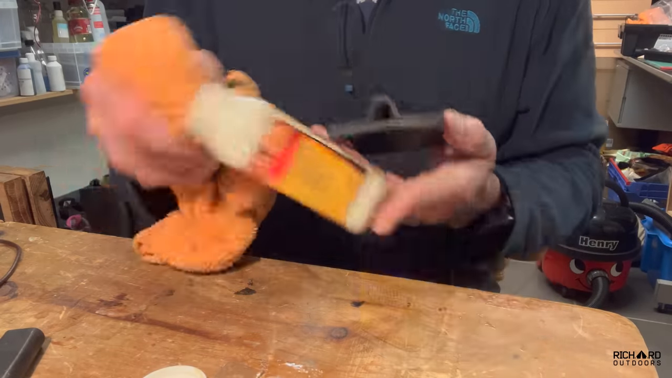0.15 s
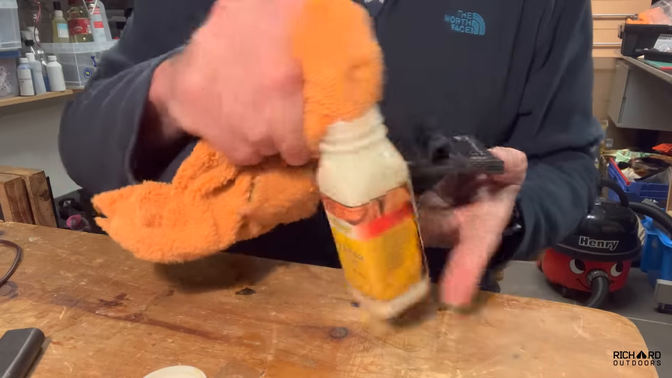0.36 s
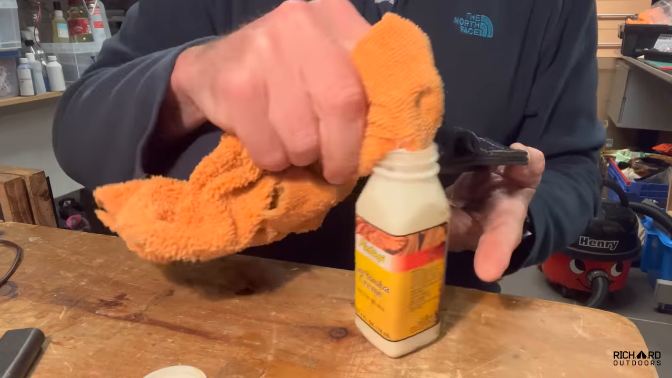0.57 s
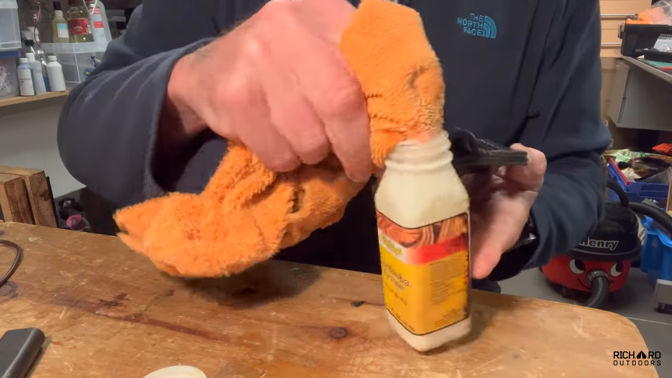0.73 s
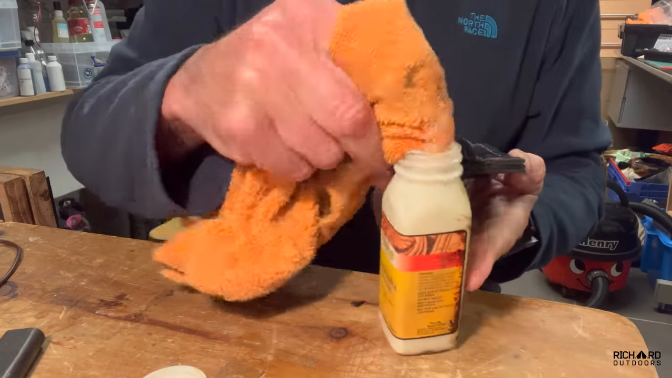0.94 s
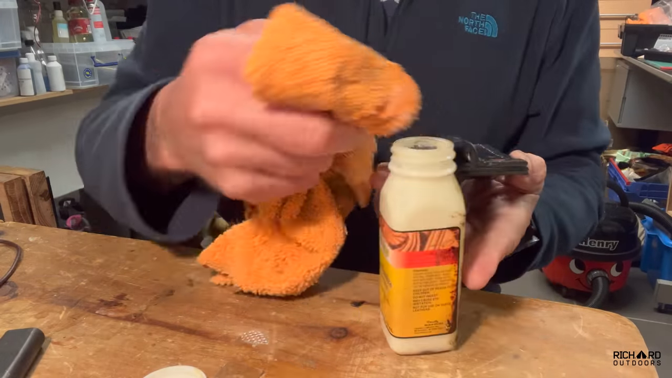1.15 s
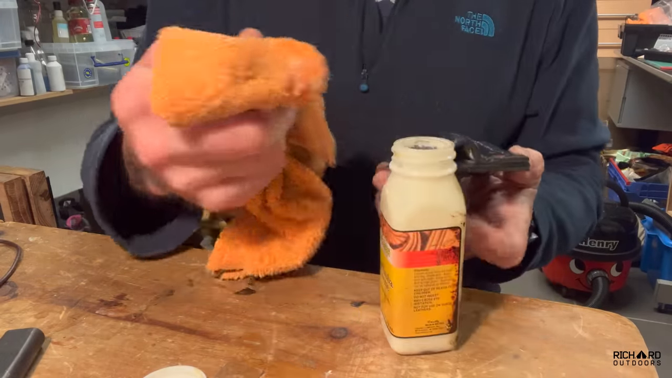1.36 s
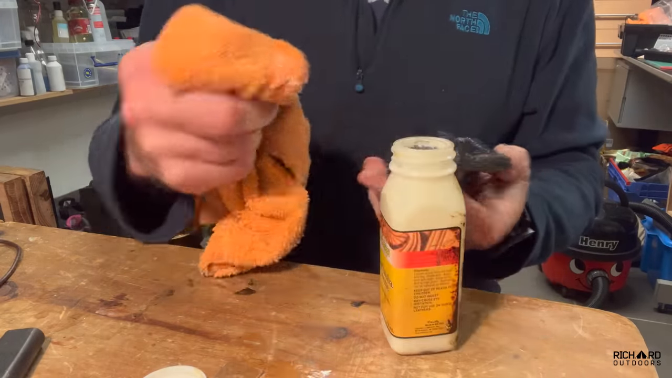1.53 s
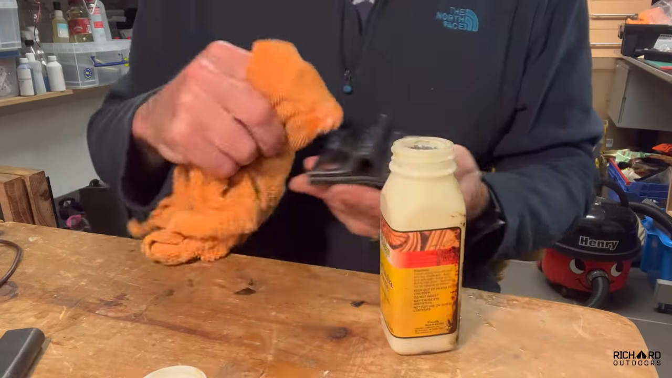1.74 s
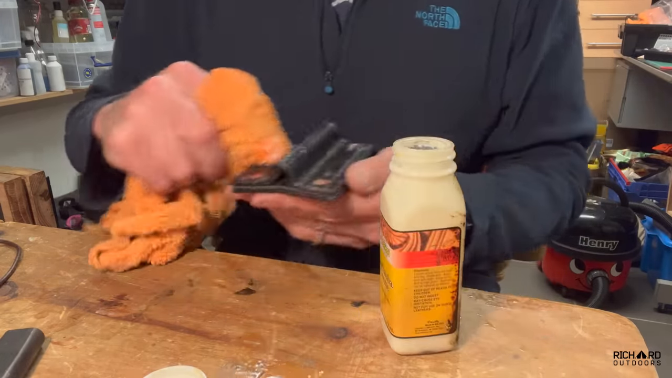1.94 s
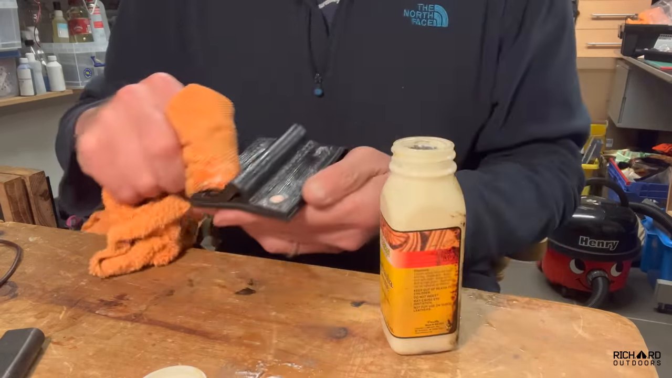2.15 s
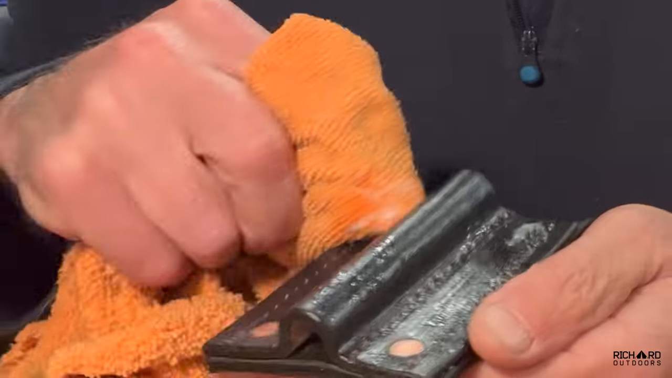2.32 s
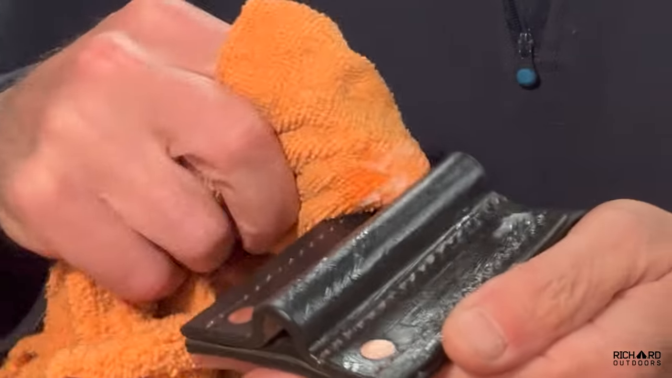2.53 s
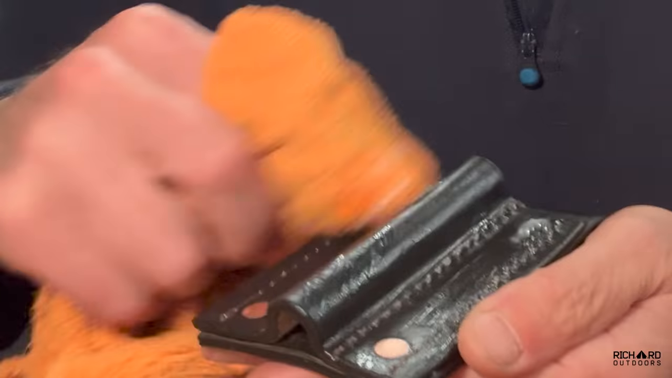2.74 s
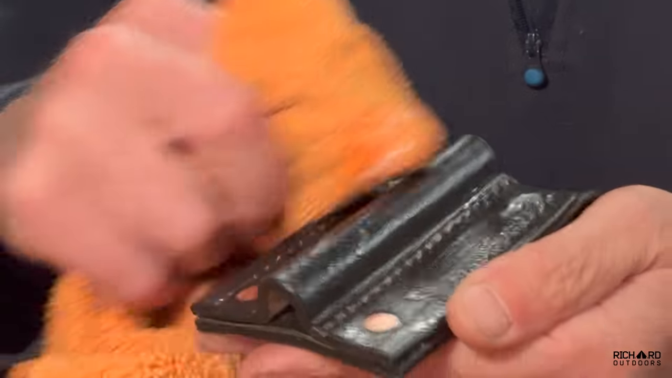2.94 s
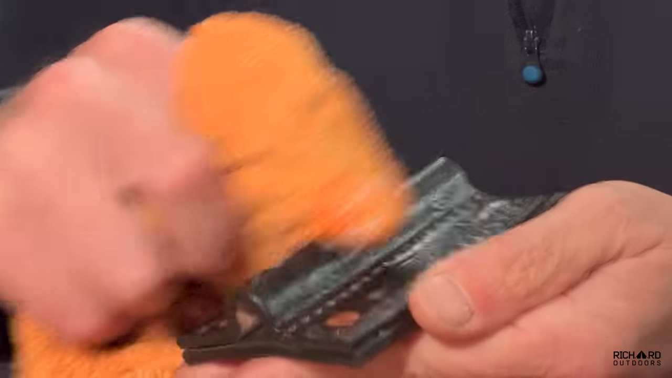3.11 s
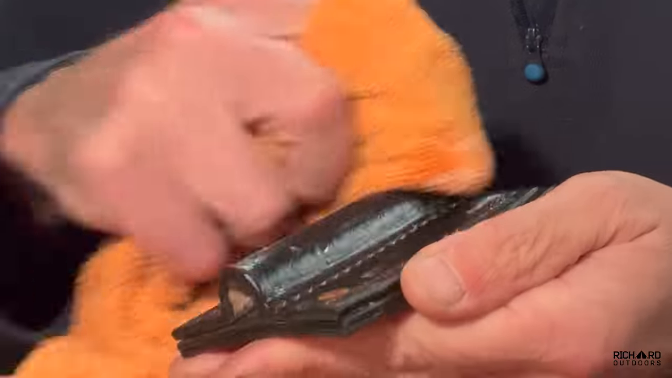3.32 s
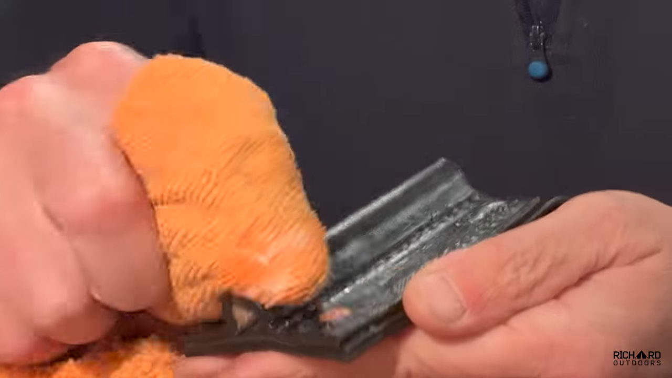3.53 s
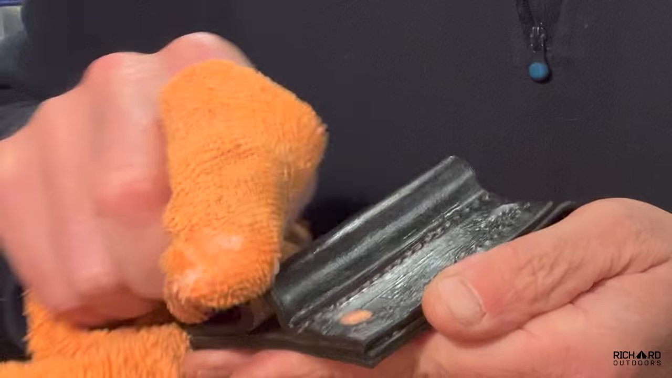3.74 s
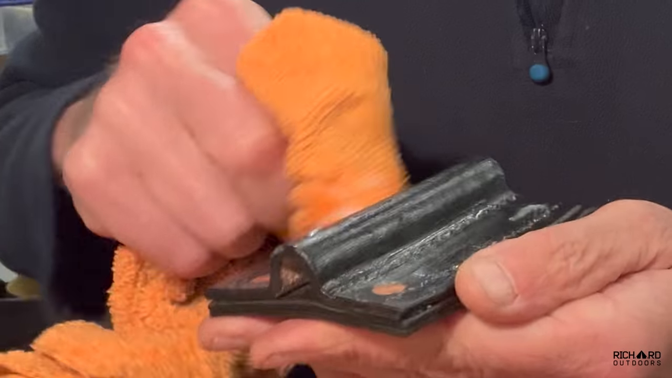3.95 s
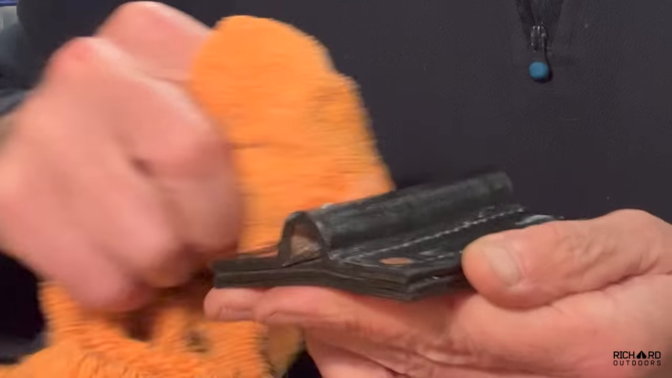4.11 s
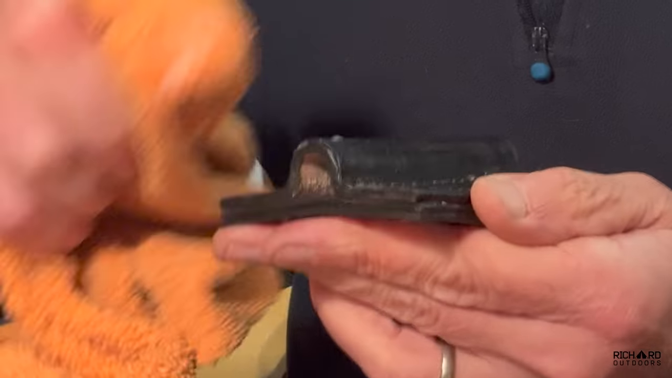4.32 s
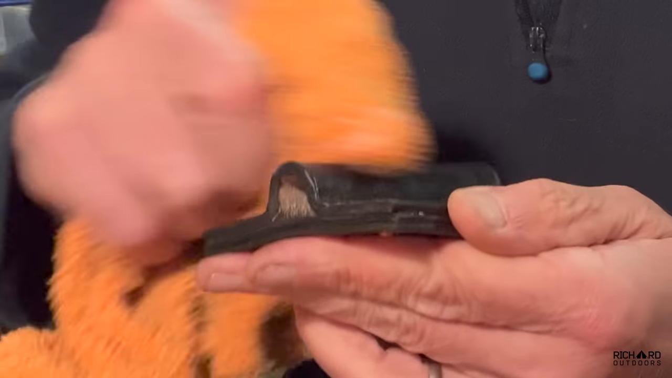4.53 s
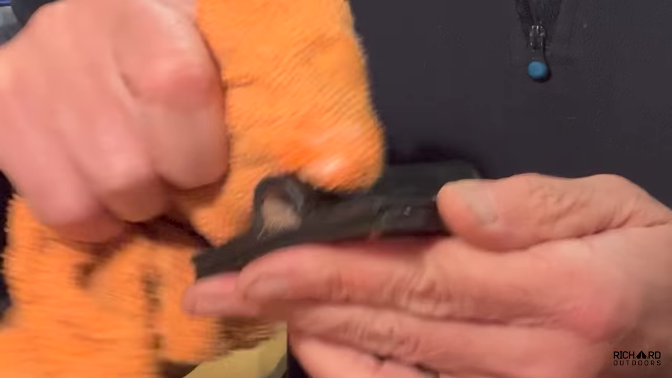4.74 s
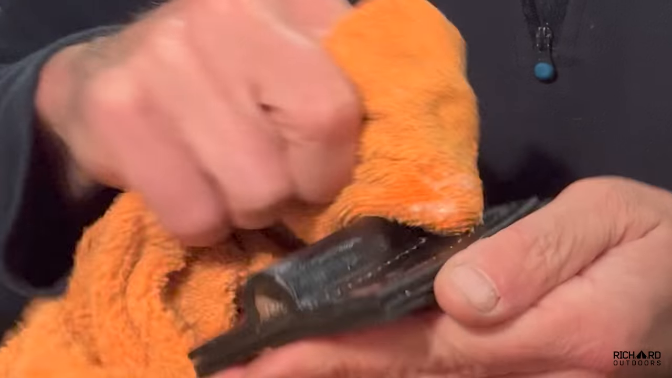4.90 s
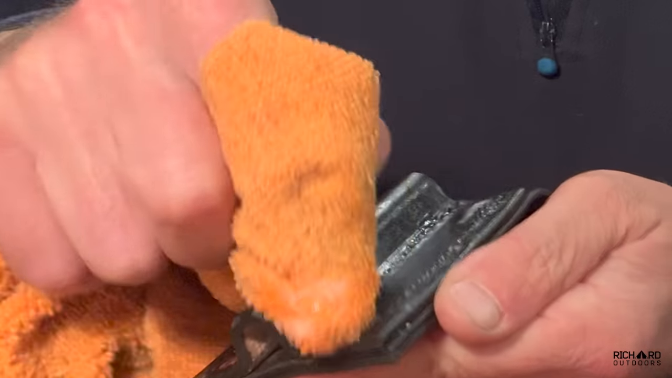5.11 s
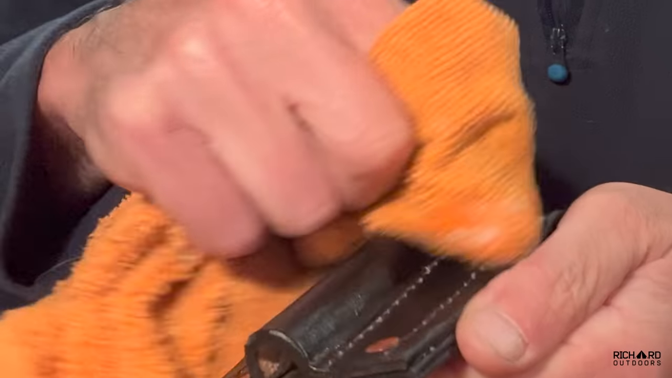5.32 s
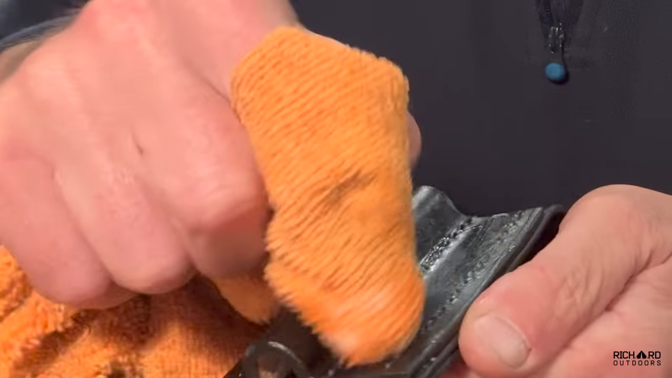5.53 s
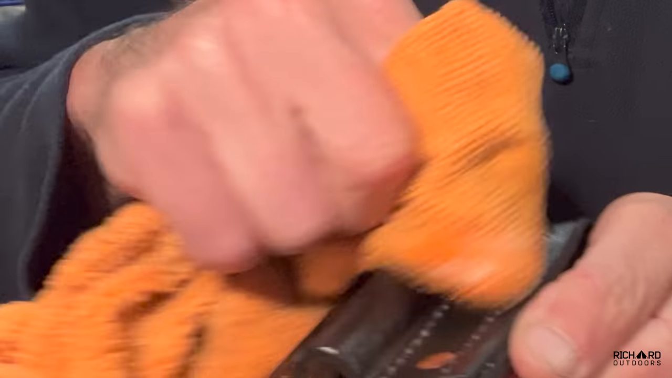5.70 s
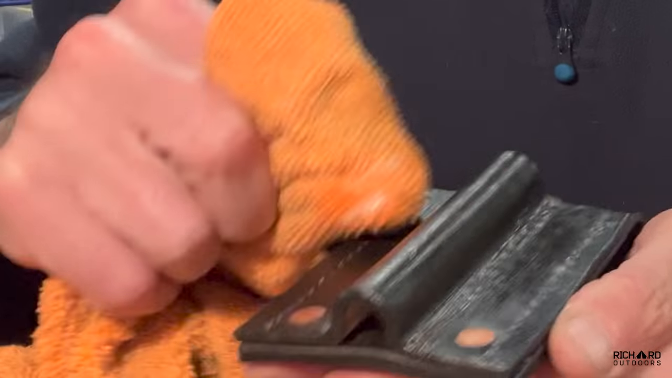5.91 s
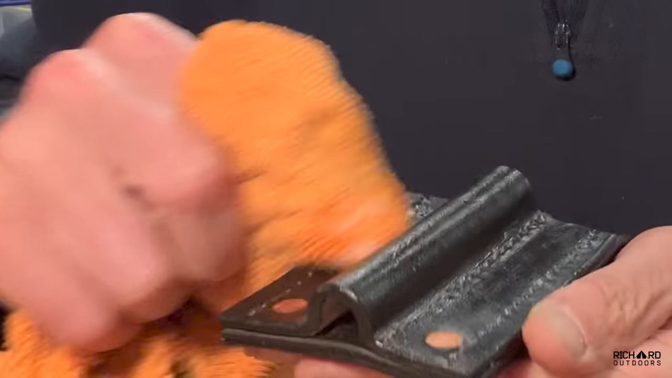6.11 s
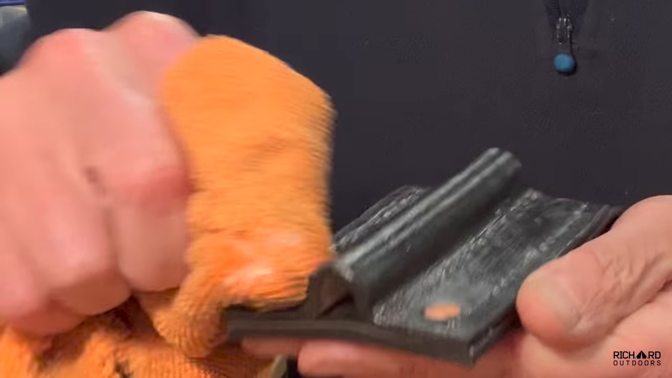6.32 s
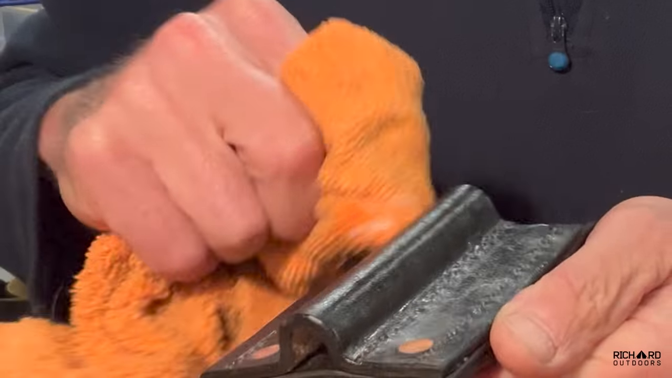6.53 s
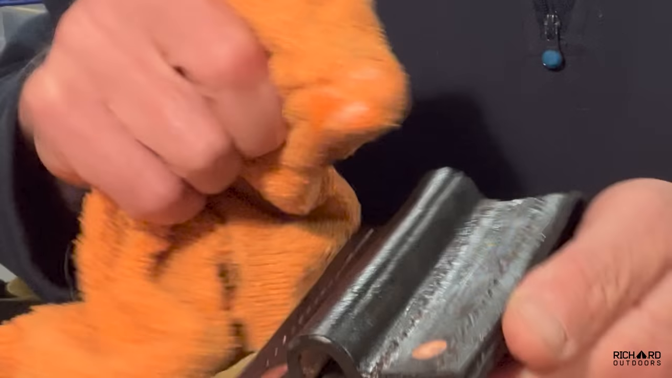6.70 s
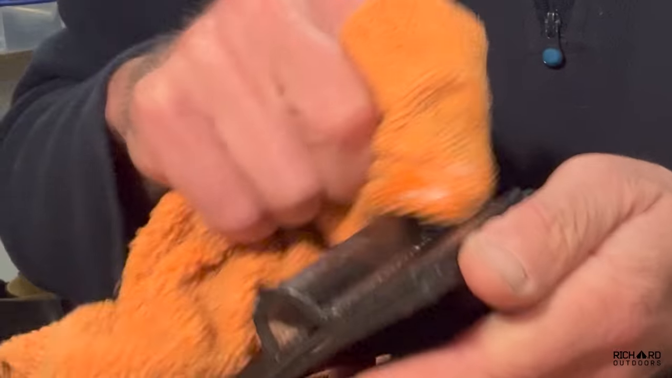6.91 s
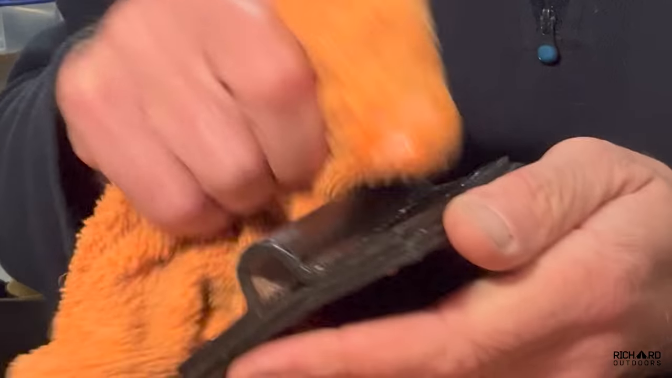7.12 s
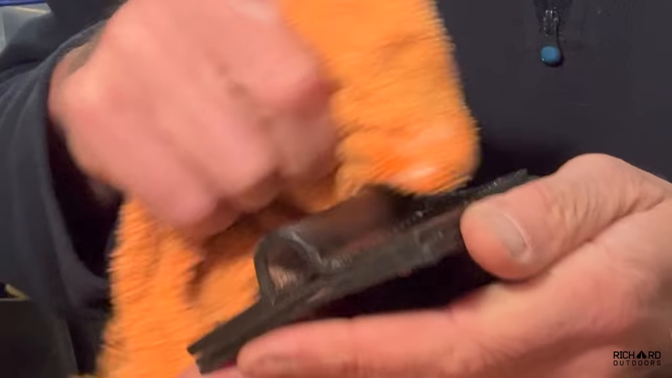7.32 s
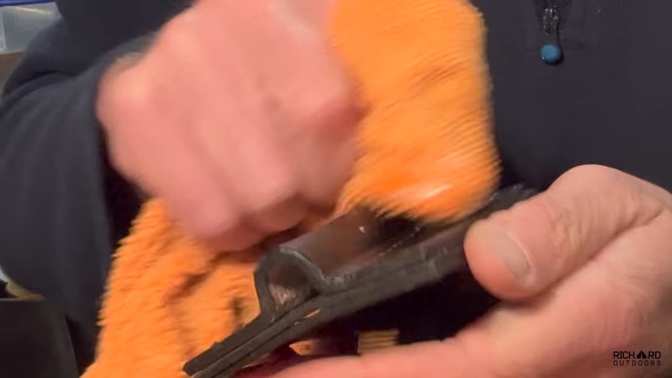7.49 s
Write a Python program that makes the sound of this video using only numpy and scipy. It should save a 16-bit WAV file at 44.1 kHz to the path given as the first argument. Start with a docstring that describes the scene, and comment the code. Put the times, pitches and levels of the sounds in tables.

```python
"""A towelling cloth rubs cream into a stiff leather piece in the hand, in uneven strokes about five a second.
Each stroke drives filtered noise: hiss and fizz of the pile, drag of the cream, hollow tone of the leather.
First a plastic bottle is set on a wooden bench and dabbed, as decaying modes; later the leather knocks.
Snags, stick-slip chirrs, rustle and a small workshop's low hum, heard through two closely spaced ports."""
import sys
import numpy as np
from scipy import signal
from scipy.fft import rfft, irfft, next_fast_len
from scipy.io import wavfile
from scipy.ndimage import uniform_filter1d, map_coordinates

SR = 44100
rng = np.random.default_rng(int(sys.argv[2]) if len(sys.argv) > 2 else 0)


def materialize(psi):
    """Save the field psi as 16-bit PCM at rate SR to the path in sys.argv[1].

    A 1-D psi becomes a single channel; in a 2-D psi each row is a channel.
    """
    bounded = np.clip(np.atleast_2d(psi).T, -1, 1)
    quanta = np.round(bounded * 32767).astype(np.int16)
    wavfile.write(sys.argv[1], SR, quanta)


N = 337541


def amp(db):
    """Decibels to gain."""
    return 10 ** (np.asarray(db) / 20)


def unit(x):
    """Scale to rms 1."""
    return x / np.sqrt(np.mean(x ** 2) + 1e-20)


def along(points, hz):
    """Interpolate (Hz, value) points on a log frequency axis."""
    point_hz, values = np.transpose(points)
    return np.interp(np.log(hz + 1), np.log(point_hz + 1), values)


def wobble(knots_per_s):
    """Smooth random curve through normally distributed knots."""
    knots = rng.standard_normal(int(N * knots_per_s / SR) + 4)
    return map_coordinates(knots, [np.arange(N) * knots_per_s / SR], order=2)


def filtered(x, response):
    """Apply a frequency response by FFT, padded against wrap-around."""
    size = next_fast_len(N + SR // 4)
    return irfft(rfft(x, size) * response(np.fft.rfftfreq(size, 1 / SR)), size)[..., :N]


def band(x, hz, width):
    """One resonance; width is a share of its frequency, limited at high frequencies."""
    q = max(1 / width, hz / (SR / 4))
    b, a = signal.iirpeak(min(hz, SR / 3), q, SR)
    return signal.lfilter(b, a, x)


def add(track, start_s, sound):
    """Mix a sound into a track, cut at the track's end."""
    part = track[..., round(start_s * SR):][..., :sound.shape[-1]]
    part += sound[..., :part.shape[-1]]


def coloured(pair, spectrum, alike):
    """Shape two unrelated signals into stereo of rms 1 with a given spectrum and left-right likeness."""
    def response(hz):
        turn = np.arccos(np.clip(along(alike, hz), -1, 1)) / 2
        beyond = np.maximum(hz / spectrum[-1][0], spectrum[0][0] / (hz + 1)).clip(1)
        skirts = 1 / beyond ** 2  # keep falling outside the listed points
        return amp(along(spectrum, hz)) * skirts * [np.cos(turn), np.sin(turn)]
    mid, side = filtered(pair, response)
    return unit(np.array([mid + side, mid - side]))


# Wavering hum lines. Each row: frequency in Hz, middle level in dB rms.
HUM_LINES = [(49, -66.5), (99, -58.5), (147, -57), (201, -60)]
# Rumble spectrum shape. Each row: frequency in Hz, density in dB per Hz.
RUMBLE_SPECTRUM = [(20, -19), (35, -15), (50, -6), (70, -2.5), (100, 3), (200, 0.5), (290, -2), (380, -2),
                   (440, 4), (540, -14.5), (700, -21), (1100, -32.5), (2200, -42.5), (6000, -45),
                   (15000, -57)]
# Left-right likeness of the rumble. Each row: frequency in Hz, likeness (0-1).
ROOM_ALIKE = [(60, 1), (130, 0.21), (290, 0.18), (450, 0.038), (620, 0.02), (1400, 0.19), (8000, 1)]
RUMBLE_DB = -46.5


def room_tone():
    """Low machine rumble as shaped noise, plus hum sines wavering in level and phase."""
    t = np.arange(N) / SR
    hum = 0
    for hz, rms_db in HUM_LINES:
        level = amp(rms_db + 2.9 * wobble(3.423)) * np.sqrt(2)  # rms to peak
        hum = hum + level * np.sin(2 * np.pi * hz * t + 1.0 * wobble(11))
    rumble = coloured(rng.standard_normal((2, N)), RUMBLE_SPECTRUM, ROOM_ALIKE)
    return hum + amp(RUMBLE_DB) * rumble


# Decay of the room's answer. Each row: frequency in Hz, t60 in s.
WALL_T60 = [(150, 0.43), (500, 0.37), (1500, 0.32), (5000, 0.33), (14000, 0.074)]
WALL_DELAY_S = 0.00356


def workshop(x):
    """Short diffuse answer from cluttered walls: decaying noise, different at each port."""
    hz, t, z = signal.stft(rng.standard_normal((2, SR // 2)), SR, nperseg=256)
    decay = amp(-60 * t / along(WALL_T60, hz)[:, None])
    tail = signal.istft(z * decay, SR, nperseg=256)[1]
    tail /= np.linalg.norm(tail[0])
    tail = np.pad(tail, ((0, 0), (round(WALL_DELAY_S * SR), 0)))
    return signal.fftconvolve(x, tail, axes=1)[:, :N]


# Left-right likeness of near sounds. Each row: frequency in Hz, likeness (1 same, negative opposed).
NEAR_ALIKE = [(100, .8), (350, .65), (620, -.1), (1200, .78), (2500, .45), (6000, .6), (8200, .992),
              (11000, .85), (14700, .95)]
# Rustle spectrum shape. Each row: frequency in Hz, density in dB per Hz.
RUSTLE_SPECTRUM = [(500, 20), (1500, -3), (4000, -0.5), (7000, -7.5), (15000, 2)]
RUSTLE_DB = -71.5


def rustle():
    """Sleeves and loose cloth: faint shaped noise with a slow and a fast flutter."""
    flutter = amp(3.5 * wobble(14) + 3.5 * wobble(120))
    return amp(RUSTLE_DB) * flutter * coloured(rng.standard_normal((2, N)), RUSTLE_SPECTRUM, NEAR_ALIKE)


def blows(events, modes, clatter, rise_cycles, port_spread, crack_db, crack_t60_s, clatter_t60_s):
    """Each blow rings damped modes, a noise crack and a clatter of crowded weak modes.

    Harder contact favours high modes; off-centre contact raises every other mode over its neighbours."""
    out, t = np.zeros((2, N)), np.arange(SR // 4) / SR
    hz, mode_db, t60_s = np.transpose(modes)[:, :, None]
    alternate = (-1) ** np.arange(len(modes))[:, None]
    swell = 1 - np.exp(-(t * hz / rise_cycles) ** 2)  # low modes build up more slowly
    port_angle = np.arccos(np.clip(along(NEAR_ALIKE, hz), -1, 1))
    skew_rad = port_spread * port_angle * np.array([-1, 1])[:, None, None]
    clatter_rise_s, clatter_level = 0.0008, np.zeros(N)
    for start_s, db, hard_db, off_centre_db, clatter_db in events:
        level_db = mode_db + hard_db * np.log2(hz / 500) / 2 + off_centre_db * alternate
        level_db = level_db + rng.standard_normal(hz.shape)
        detune = 1 + 0.019 * rng.standard_normal(hz.shape)
        tone = np.sin(2 * np.pi * hz * detune * t + skew_rad)
        ring = (amp(level_db - 60 * t / t60_s) * swell * tone).sum(axis=1)
        crack = amp(crack_db + hard_db - 60 * t / crack_t60_s) * rng.standard_normal((2, len(t)))
        add(out, start_s, amp(db) * (ring + crack))
        clatter_rise = 1 - np.exp(-(t / clatter_rise_s) ** 2)
        add(clatter_level, start_s, amp(clatter_db - 60 * t / clatter_t60_s) * clatter_rise)
    return out + clatter_level * coloured(rng.standard_normal((2, N)), clatter, NEAR_ALIKE)


# Bottle meets the bench, rocks and is dabbed. Each row: start in seconds, level in dB,
# hardness in dB, off-centre in dB, clatter level in dB.
BOTTLE_THUMPS = [(0.4638, -5, -1.5, -1, -26), (0.4905, -28, -20, 7.5, -57), (0.7945, -32.5, -36.5, -1, -34),
                 (0.843, -32.5, -7, 5.5, -48), (1.047, -35, -21, 4, -46.5), (1.088, -35.5, -30, 0.5, -46.5),
                 (1.143, -35.5, -24, 6.5, -48), (1.329, -35.5, -11, 1.5, -47.5)]
# Modes of bottle and bench top. Each row: frequency in Hz, level in dB, t60 in s.
BENCH_MODES = [(134, -21.5, 0.087), (249.6, -3, 0.087), (359, -2, 0.054), (420, 13.5, 0.024),
               (443, 13, 0.0078), (542, -13.5, 0.028), (694, -15, 0.045), (830, -12, 0.045),
               (1455, -13.5, 0.018), (1548, -8.5, 0.016), (2600, -24, 0.016), (3680, -26, 0.015),
               (5500, -23.5, 0.012)]
# Clatter spectrum shape. Each row: frequency in Hz, density in dB per Hz.
BENCH_CLATTER = [(400, 11), (700, 8), (850, 0.5), (1030, -1.5), (1300, -3), (1650, -12), (2000, -19.5),
                 (3700, -25), (6000, -28), (14000, -26)]


def bottle_on_bench():
    """Contact with the bench rings the modes of bottle and bench top."""
    return blows(BOTTLE_THUMPS, BENCH_MODES, BENCH_CLATTER, rise_cycles=1.7, port_spread=0.45,
                 crack_db=-23, crack_t60_s=0.0031, clatter_t60_s=0.12)


# The piece knocks in the hand. Each row: start in seconds, level in dB,
# hardness in dB, off-centre in dB, clatter level in dB.
LEATHER_KNOCKS = [(2.2068, -16, -1, 0, -44), (2.751, -31, -3, 1, -43), (2.811, -37.5, -28, -3, -59),
                  (3.0535, -24, 1.5, -1.5, -37), (4.8353, -10.5, 3, 0.5, -24), (4.9622, -20, 0, 3, -45),
                  (6.4305, -21, -4.5, 1.5, -42), (6.6663, -26.5, 0, 0, -33.5)]
# Modes of the leather piece. Each row: frequency in Hz, level in dB, t60 in s.
LEATHER_MODES = [(246.5, -12, 0.12), (349.5, -2, 0.06), (434, -2, 0.044), (950, 7, 0.01),
                 (881, -4.5, 0.034), (1020, -7, 0.034), (1144, -8, 0.048), (1310, -13.5, 0.02),
                 (2200, -26, 0.02)]
# Clatter spectrum shape. Each row: frequency in Hz, density in dB per Hz.
LEATHER_CLATTER = [(620, -18), (850, -0.5), (1150, -3.5), (1320, -7), (1700, -13), (2300, -19), (3600, -30)]


def leather_knocks():
    """Knocks ring the short modes of the stiff piece, louder on the left."""
    knocks = blows(LEATHER_KNOCKS, LEATHER_MODES, LEATHER_CLATTER, rise_cycles=1.61, port_spread=0.39,
                   crack_db=-43, crack_t60_s=0.006, clatter_t60_s=0.072)
    return knocks * amp([[.7], [-.7]])


# Snags of cloth and fingers. Each row: start in seconds, level in dB, centre in Hz.
SNAGS = [(0.1918, -54, 1700), (0.2404, -56.5, 1800), (0.5627, -44.5, 4340), (0.6524, -56.5, 4500),
         (0.7942, -46.5, 3000), (0.868, -53, 7000), (1.267, -48, 3500), (1.7835, -47, 4900),
         (2.126, -45, 1480), (2.3188, -54, 3500), (2.5666, -45, 3500), (3.578, -41, 5040),
         (4.0793, -45, 1400), (4.3582, -52.5, 7000), (4.866, -45, 12000), (6.0678, -46.5, 9000)]
CLICK_T60_S, CLICK_RISE_S = 0.0055, 0.0004
TRAIL_DB, TRAIL_T60_S = -12.5, 0.15


def snags():
    """A snag lets go with a click of band noise, then the fibres settle in a weaker trail."""
    out, t = np.zeros((2, N)), np.arange(SR // 6) / SR
    fade = amp(-60 * t / CLICK_T60_S) + amp(TRAIL_DB - 60 * t / TRAIL_T60_S)
    fade *= 1 - np.exp(-t / CLICK_RISE_S)
    for start_s, db, hz in SNAGS:
        shared, own = rng.standard_normal(len(t)), rng.standard_normal((2, len(t)))
        click = unit(band(shared + 0.064 * own, hz, width=0.7))
        add(out, start_s, amp(db) * fade * click)
    return out


# Tacky cream grabs, leather chirrs. Each row: middle in seconds, level in dB, length in s, frequency in Hz.
CHIRRS = [(2.562, -60, 0.024, 1440), (2.76, -50, 0.035, 776), (2.926, -60, 0.087, 1520),
          (3.824, -42.5, 0.015, 1400), (4.152, -48, 0.069, 1255), (4.187, -41.5, 0.015, 1320),
          (4.576, -49.5, 0.024, 1460), (5.639, -49.5, 0.093, 887), (6.143, -47.5, 0.051, 1205),
          (6.904, -50.5, 0.032, 1485), (7.437, -54, 0.0055, 3680)]


def chirrs():
    """Short runs of stick and slip, as noise, feed one narrow resonance of the leather."""
    out, t = np.zeros(N), np.arange(-SR // 8, SR // 8) / SR
    for middle_s, db, length_s, hz in CHIRRS:
        ring = band(band(rng.standard_normal(len(t)), hz, width=0.2), hz, width=0.3)
        envelope = np.exp(-2 * (t / length_s) ** 2)
        add(out, middle_s + t[0], amp(db) * envelope * unit(ring))
    return out


def friction(spectrum, grain_db, grains_per_s, patchy_db):
    """Countless fibre slips, bunched into grains; their colour shifts as the contact patch travels."""
    slips = rng.standard_normal((2, N)) * amp(grain_db * wobble(grains_per_s))
    z = signal.stft(slips, nperseg=512)[2]
    field = rng.standard_normal(z.shape[1:])
    field = uniform_filter1d(field, size=4, axis=0)  # over frequency
    field = uniform_filter1d(field, size=9, axis=1)  # over time
    slips = signal.istft(z * amp(patchy_db * unit(field)), nperseg=512)[1][:, :N]
    return coloured(slips, spectrum, NEAR_ALIKE)


# Cloth strokes, the first few on the bottle's neck. Each row: middle in seconds, length in s, strength in dB,
# resonance of the piece in dB, brightness in dB, upper resonance over lower in dB.
STROKES = [(0.2, 0.18, -71, -9, 0, 3), (0.84, 0.43, -71, 4, 5, -6.5), (1.25, 0.3, -70, -1.5, 0, -15),
           (1.559, 0.15, -65, -4.5, 1.0, 4), (1.679, 0.11, -59, -10, -1.5, -0.5),
           (1.866, 0.19, -59.5, -11, -1, 1.0), (1.957, 0.15, -55.0, 2, 0.5, -5.5),
           (2.154, 0.075, -60, 7, 2.5, -10), (2.243, 0.17, -54, 4, -1, -0.5),
           (2.431, 0.035, -70.5, 0.5, -9, -11), (2.56, 0.072, -65.5, -2, 3, 8),
           (2.68, 0.054, -60.5, 3, -3, 0), (2.757, 0.087, -44, 1.5, -5.5, 1),
           (2.889, 0.09, -60.5, -1, -1.5, 5), (2.971, 0.07, -55, 2, 0.5, 6),
           (3.089, 0.13, -50.5, -1, 0, 1.5), (3.278, 0.098, -53, 1.5, 3.5, 2),
           (3.443, 0.13, -45.5, -1.5, -2.5, -0.5), (3.625, 0.072, -61.5, 0.5, 1, -14),
           (3.801, 0.14, -51, 3.5, -1.5, 2), (3.916, 0.16, -58.0, 3, -1.5, 2.5),
           (4.14, 0.15, -50.5, -4.5, -2, -10), (4.552, 0.1, -51, 2, 0, 1.5),
           (4.702, 0.098, -53.5, -0.5, -1, -3), (4.843, 0.066, -49.5, 2, 2.5, -10),
           (5.026, 0.17, -53.5, -2, 0, 3), (5.283, 0.15, -48.5, 1.5, 3, -0.5),
           (5.472, 0.15, -52.5, 1.5, 1, 1), (5.691, 0.17, -52, 3, 2, 2.5), (5.82, 0.13, -60.5, 7, 3, 4),
           (6.137, 0.12, -49, 0.5, -2, -5), (6.462, 0.27, -53.5, 3.5, -1, -2),
           (6.904, 0.084, -55, 6, 6, 3.5), (7.198, 0.091, -58.5, 5.5, 2, 6),
           (7.342, 0.13, -61.5, -1, 2, -2), (7.504, 0.091, -53, 2.5, 0, 1.5)]
# Spectrum shapes of the voices: pile hiss, pile fizz, cream drag, lower and upper resonance of the piece.
# Each row: frequency in Hz, density in dB per Hz.
HISS_SPECTRUM = [(900, -30), (1900, -7), (2250, -4), (2800, -1), (3800, .5), (5000, -1.5), (6500, -4),
                 (9000, -10), (12000, -25)]
FIZZ_SPECTRUM = [(4500, -25), (7000, -5), (8500, -2.5), (10000, -.5), (11600, 1), (13000, -.5),
                 (14700, -4.5)]
DRAG_SPECTRUM = [(200, -11), (350, 2), (580, -5), (730, -2), (900, -6.5), (1080, -8), (1400, -25)]
HOLLOW_LOW_SPECTRUM = [(800, -40), (1080, 3.5), (1240, 2), (1400, -2.5), (1600, -7)]
HOLLOW_HIGH_SPECTRUM = [(1200, -39), (1400, 8.5), (1540, 3.5), (1740, 4.5), (2000, -5.5), (2500, -30)]
FIRM_DB = -54  # strength of an ordinary stroke
DRAG_DB, HOLLOW_DB, HISS_DB, FIZZ_DB = -3, -5, -1.14, -2  # voices relative to stroke strength
EDGE_DB, SWELL_POWER = 12.5, 2.13  # drop at the two ends of a stroke; flatness of its top
LINGER_DB, LINGER_LENGTHS = -23.5, 2  # light contact around a stroke: level, reach in stroke lengths


def cloth():
    """Strokes swell and fade by one rule and drive all friction voices; place of pressing shifts resonance."""
    t, power = np.arange(N) / SR, np.zeros((5, N))
    for middle_s, length_s, db, resonance_db, bright_db, upper_db in STROKES:
        near = slice(max(0, round((middle_s - .7) * SR)), round((middle_s + .7) * SR))
        away = np.abs(t[near] - middle_s) / length_s
        sweep = amp(-EDGE_DB * (2 * away) ** SWELL_POWER)
        linger = amp(LINGER_DB) * np.exp(-(away / LINGER_LENGTHS) ** 2)
        lower_db, higher_db = resonance_db - upper_db / 2, resonance_db + upper_db / 2
        voices_db = np.array([0, resonance_db, lower_db, higher_db, bright_db])
        power[:, near] += amp(db - FIRM_DB + voices_db[:, None]) ** 2 * (sweep ** 2 + linger ** 2)
    effort, tug, lower, upper, fizz = np.sqrt(power)
    pressure = amp(FIRM_DB + 1.16 * wobble(45))  # the hand never presses evenly
    # tacky cream tugs at the leather
    body = amp(DRAG_DB) * tug * friction(DRAG_SPECTRUM, grain_db=1.0, grains_per_s=310, patchy_db=3)
    for drive, spectrum in ((lower, HOLLOW_LOW_SPECTRUM), (upper, HOLLOW_HIGH_SPECTRUM)):
        hollow = friction(spectrum, grain_db=1.0, grains_per_s=160, patchy_db=3.0)
        body += amp(HOLLOW_DB) * drive * hollow
    pile = amp(HISS_DB) * effort * friction(HISS_SPECTRUM, grain_db=0.5, grains_per_s=730, patchy_db=2.5)
    pile += amp(FIZZ_DB) * fizz * friction(FIZZ_SPECTRUM, grain_db=3.0, grains_per_s=2800, patchy_db=3.5)
    return pressure * (body + pile)


# Share of the bottle and bench sound sent to the room. Each row: frequency in Hz, gain in dB.
BENCH_WET = [(400, -20.5), (1500, -19.5), (2600, -13), (7000, -21)]
# Balance between the ports. Each row: frequency in Hz, left minus right in dB.
BALANCE = [(100, 6), (350, -4), (1200, -0.9), (2300, -1.5), (4200, -5), (7700, -5), (14000, 2)]
LEATHER_WET_DB, RUBBING_WET_DB = -18, -31


def scene():
    """Bottle, leather and cloth close to the ports, with the room's answer and its tone."""
    bottle = bottle_on_bench()
    leather = leather_knocks()
    rubbing = cloth() + snags() + rustle() + chirrs()
    to_room = filtered(bottle, lambda hz: amp(along(BENCH_WET, hz)))
    to_room += amp(LEATHER_WET_DB) * leather + amp(RUBBING_WET_DB) * rubbing
    near = bottle + leather + rubbing + workshop(to_room)
    half_each = np.array([[.5], [-.5]])
    return filtered(near, lambda hz: amp(along(BALANCE, hz) * half_each)) + room_tone()


# Phase between the ports. Each row: frequency in Hz, left lag in radians.
LAG = [(1200, 0), (4200, 1.3), (6200, 1.6), (8200, np.pi), (9900, 4.8), (11700, 2 * np.pi), (13400, 7.8),
       (14700, 3 * np.pi)]
TOP_HZ = 14700


def record(dry):
    """Sound reaches the left port a little late; nothing is kept from the band limit up."""
    half_each = np.array([[-.5], [.5]])
    return filtered(dry, lambda hz: np.exp(1j * along(LAG, hz) * half_each) * (hz < TOP_HZ))


dry = scene()
out = record(dry)
materialize(out)
```